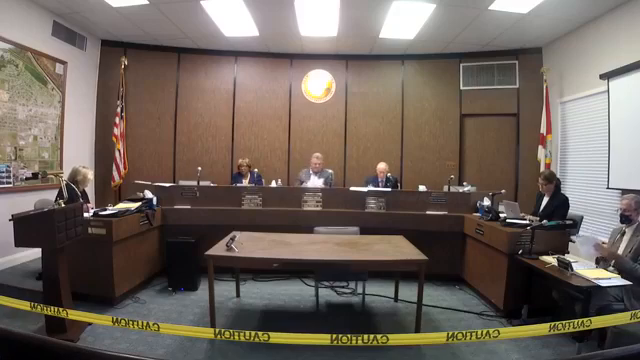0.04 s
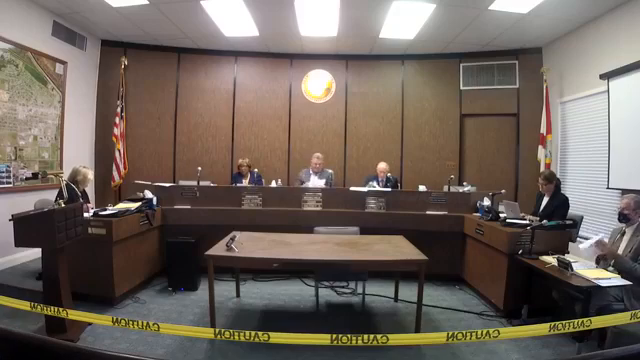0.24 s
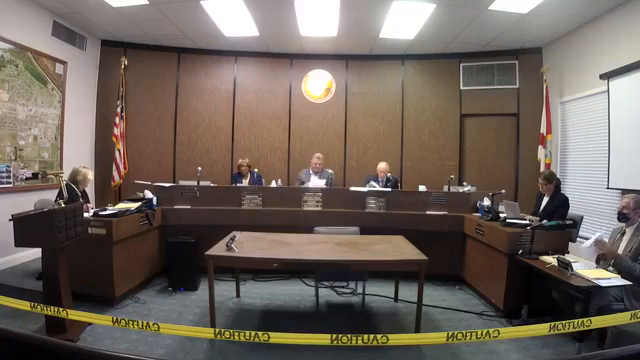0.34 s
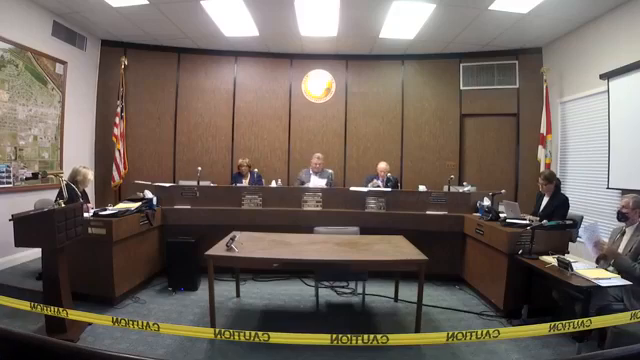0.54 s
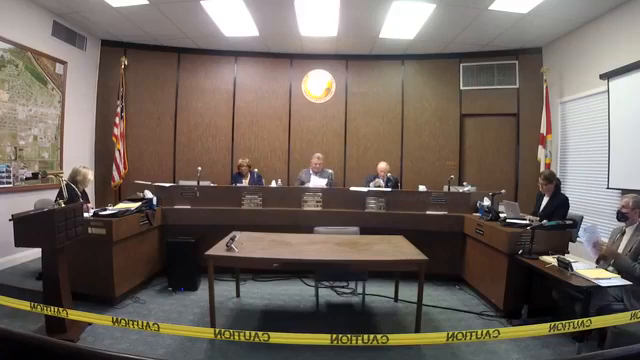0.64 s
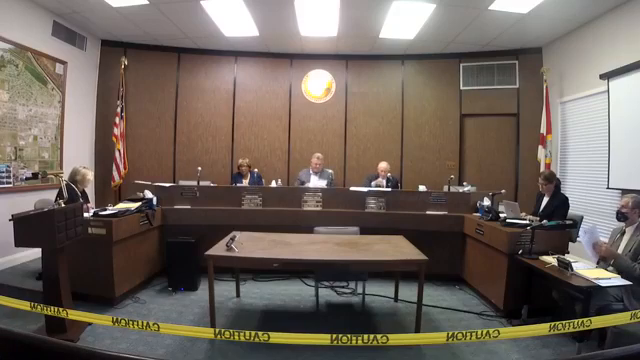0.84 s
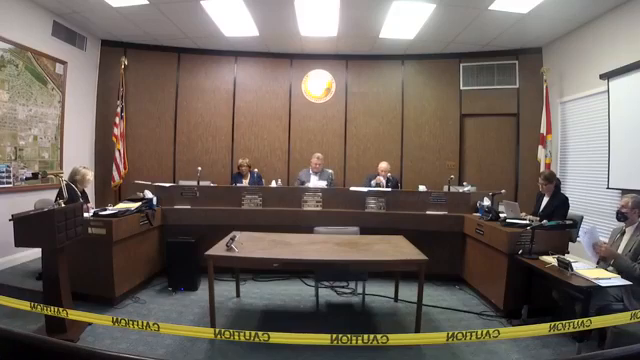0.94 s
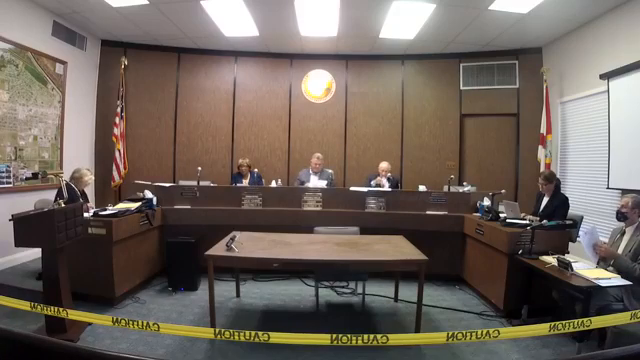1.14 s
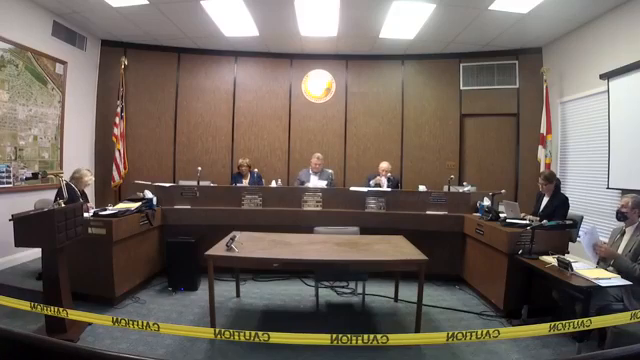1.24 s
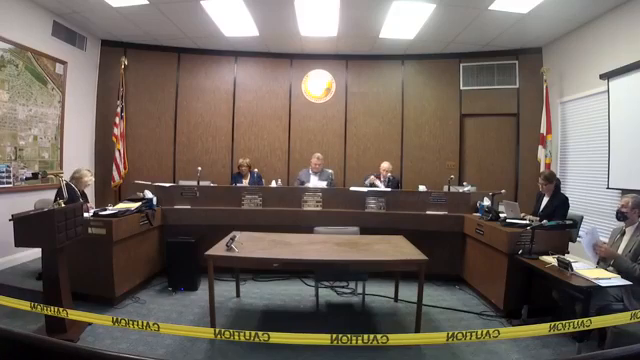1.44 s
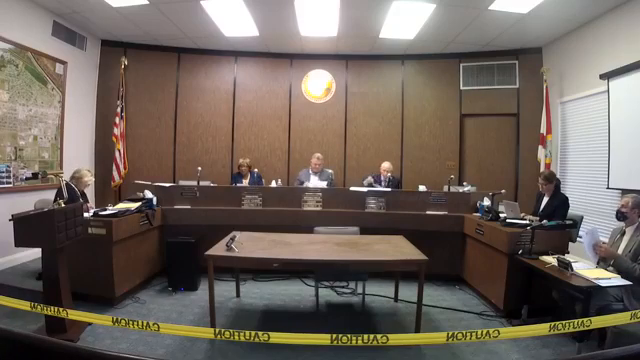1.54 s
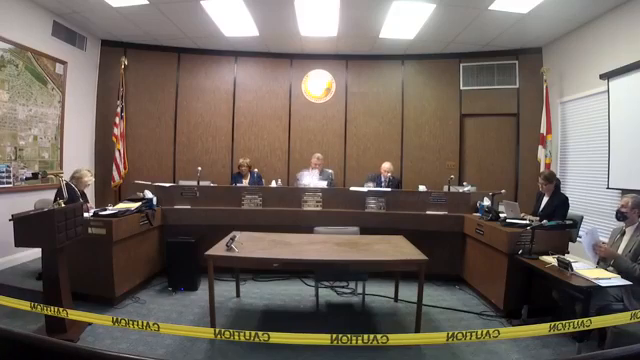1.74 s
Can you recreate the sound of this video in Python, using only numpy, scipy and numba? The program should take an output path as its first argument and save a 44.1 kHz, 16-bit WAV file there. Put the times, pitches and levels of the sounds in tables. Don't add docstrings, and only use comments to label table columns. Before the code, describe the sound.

Paper is handled on a desk close to a table microphone: faint rustles, two loud plastic clip snaps, then crisp bursts of crumpling and soft thuds in a quiet panelled room with low ventilation hum.

```python
import sys
import numpy as np
from scipy import signal
from scipy.fft import rfft, irfft
from scipy.io import wavfile
from scipy.ndimage import uniform_filter1d
from numba import njit

SR = 44100
rng = np.random.default_rng(int(sys.argv[2]) if len(sys.argv) > 2 else 0)


def invert_db(x):
    u = np.asarray(x, float) / 20
    return 10 ** u


def transcribe(u):
    v = np.clip(np.atleast_2d(u).T, -1, 1)
    q = np.round(v * 32767).astype(np.int16)
    wavfile.write(sys.argv[1], SR, q)


N = 79380

# peak t/s, rise/s, fall/s, level/dB, f/Hz
STROKES = [(0.044, 0.027, 0.015, -57.5, 1150), (0.098, 0.0038, 0.013, -41.5, 1030),
           (.139, 0.0017, 0.0047, -39, 1900), (.151, 0.0023, .006, -34, 1770),
           (0.16, 0.0057, .014, -42, 1170), (.42, 0.055, 0.078, -44.5, 1260),
           (.528, .003, .02, -34.5, 1980), (0.562, 0.013, 0.026, -45.5, 1370),
           (0.734, 0.015, 0.014, -53.5, 1220), (0.8, 0.0015, 0.008, -44.5, 1550),
           (0.928, 0.00068, 0.023, -37, 1780), (.96, 0.021, .02, -49.5, 593),
           (1.0, 0.029, 0.014, -33.5, 1890), (1.014, 0.0086, 0.0098, -24.5, 1470),
           (1.027, 0.003, 0.01, -15.5, 2054), (1.052, 0.0053, 0.021, -24, 2160),
           (1.102, 0.0018, 0.01, -36, 2500), (1.125, .012, 0.0071, -26, 2170),
           (1.138, 0.0023, 0.0031, -25, 2500), (1.148, 0.004, 0.013, -27.5, 2060),
           (1.413, 0.0044, 0.02, -38, 1420), (1.429, .002, .006, -36, 1570),
           (1.443, 0.013, .006, -39, 2200), (1.4537, 0.00104, 0.0043, -25, 1460),
           (1.471, 0.00087, 0.0063, -24, 1330), (1.488, 0.0045, 0.0085, -29, 1630),
           (1.502, 0.0085, 0.013, -27.5, 1410), (1.534, 0.007, 0.019, -31, 1300),
           (1.56, 0.009, 0.053, -48, 1016), (1.655, 0.0066, 0.0089, -35.5, 1195),
           (1.666, 0.0051, .006, -38, 1330), (1.722, 0.00095, .008, -38.5, 1670),
           (1.758, 0.016, 0.012, -34, 1820), (1.785, 0.017, 0.027, -37.5, 1480)]
# t/s, peak
# level/dB, f/Hz
SHARP_CREASES = [(0.096, -27, 3150), (.1385, -43, 3540), (0.192, -53, 3000), (0.268, -31, 4530),
                 (.339, -18.5, 4000), (0.3588, -16, 6400), (0.527, -33, 3040), (.559, -46, 3470),
                 (0.734, -30.5, 3480), (0.8965, -28, 7000), (0.9286, -44, 2500), (1.0004, -24.5, 2500),
                 (1.0173, -29, 2500), (1.027, -23, 2730), (1.1015, -39, 4000), (1.146, -32, 2500),
                 (1.158, -31, 2500), (1.4721, -18.5, 2500), (1.486, -25, 4940), (1.52, -21, 3500),
                 (1.608, -30.5, 2500), (1.643, -24, 2660), (1.666, -27, 5900), (1.757, -29.5, 2920),
                 (1.7663, -39, 3400)]
# peak t/s, rise/s, fall/s, level/dB, tilt/(dB per octave)
SLIDES = [(0.099, 0.0041, 0.0062, -51, -8), (.115, 0.006, 0.0093, -54, -2), (0.138, .004, .03, -54, -3),
          (0.239, 0.0027, 0.041, -49.5, -6), (0.3207, .0005, 0.011, -30.5, 3),
          (0.326, 0.0011, 0.026, -44.5, 9.5), (.385, 0.007, 0.047, -44.5, 1.5),
          (0.525, 0.0015, 0.0065, -51, -3), (0.56, 0.0025, 0.031, -62, 2),
          (.735, 0.019, 0.031, -58.5, -0.5), (0.934, 0.01, 0.017, -47, -2.2),
          (0.977, 0.029, 0.043, -46.5, 2.5), (1.029, 0.025, 0.021, -38, -2),
          (1.106, .003, 0.0067, -41.5, -6), (1.15, 0.013, 0.036, -48.5, 4.5),
          (1.199, 0.037, 0.06, -52, -5.5), (1.351, 0.011, 0.054, -59.5, -11.2),
          (1.452, .025, 0.015, -45, 5.5), (1.487, 0.015, 0.017, -42.5, 1.5),
          (1.561, 0.039, 0.044, -47.5, 0), (1.641, 0.0067, 0.014, -52, 0), (1.69, 0.022, .02, -66, 14),
          (1.76, 0.042, .05, -54.5, -2.5)]
# f/Hz, width/Hz, level/dB
HISS_BANDS = [(2560, 3200, 3.5), (4070, 1700, 1), (7200, 4000, -9), (8840, 1320, -6), (12600, 3400, -28.5)]
# t/s, peak level/dB
SNAPS = [
    (0.2343, -2),
    (0.3239, 0.5),
]
CLIP_MODES = [
    [(800, 370, -12), (1850, 440, -3.7), (3590, 370, -10.5), (4700, 820, 1.5), (6400, 460, -19),
     (7000, 350, -38), (8900, 180, -49)],
    [(1150, 850, 6.5), (1930, 160, -0.5), (2500, 670, 1), (4090, 370, 4), (4770, 220, 0.5),
     (5900, 630, 4.5), (7450, 1700, 6), (9800, 620, -0.5), (10400, 290, -31)],
]
# t/s, level/dB, length/s
THUDS = [(0.137, -46, 0.04), (0.317, -37.5, 0.035), (0.523, -41.5, 0.031), (0.713, -42, 0.014),
         (0.926, -45.5, 0.056), (0.983, -41.5, 0.07), (1.006, -35.5, 0.052), (1.129, -43, 0.023),
         (1.254, -46, 0.015), (1.4, -46.5, 0.099), (1.473, -48.5, 0.065), (1.631, -43, 0.029),
         (1.73, -43, 0.056)]
# f/Hz, width/Hz, level/dB
DESK_MODES = [(122.2, 22, -10), (203, 152, -3.5), (333, 232, -9.5), (524, 330, -6.5)]
# f/Hz, level/(dB per Hz)
AIR_SPECTRUM = [(18, 1), (60, -14), (161, 4), (319, -2.5), (1540, -10), (1860, -7), (2290, -10.5),
                (3140, -10), (16000, -19.5)]
# f/Hz, width/Hz, level/dB
HUM_BANDS = [(121.4, 10.7, -63), (182, 52, -65.5)]


def creases():
    pops, spread_oct, ring_cycles, scatter_db = 320, 0.45, 1.6, 1.5
    out = 0
    for t, rise, fall, db, hz in STROKES:
        u = rng.random((pops, 2)).T
        g = rng.standard_normal((pops, 2)).T
        late = -3 * rise + 3 * (rise + fall) * u[0]
        pitch = 2 ** (spread_oct * g[0])
        size = invert_db(db + 4.5 - scatter_db * np.log(u[1])) * swell(late, rise, fall) * np.sign(g[1])
        size = size * np.sqrt((rise + fall) * 20 * pitch)
        out = out + swarm(t + late, hz * pitch, ring_cycles, size)
    return out


def sharp_creases():
    pops, fade_s, spread_oct, ring_cycles = 12, 0.0018, 1.32, 1.48
    out = 0
    for t, db, hz in SHARP_CREASES:
        u = rng.random((pops, 3)).T
        place = 2 * (np.arange(pops) + u[1]) / pops - 1
        pitch = 2 ** (spread_oct * place)
        size = invert_db(db + 3.5) * np.sign(u[2] - 0.5) * np.exp(-2 * u[0])
        out = out + swarm(t + 2 * fade_s * u[0], hz * pitch, ring_cycles, size)
    return out


def swarm(t, hz, cycles, size):
    hz = np.clip(hz, 200, 15000)
    start = (t * SR).astype(np.int64)
    return grains(N, start, 2 * np.pi * hz / SR, np.exp(-hz / SR / cycles), size)


@njit
def grains(n, start, turn, fade, size):
    out = np.zeros(n)
    for k in range(len(start)):
        wave = size[k] + 0j
        step = fade[k] * np.exp(1j * turn[k])
        soft = 1.0
        for i in range(max(start[k], 0), min(start[k] + 600, n)):
            out[i] += wave.imag * (1 - soft)
            wave *= step
            soft *= fade[k] ** 3
    return out


def swell(late, rise, fall):
    return np.exp(np.where(late < 0, late / rise, -late / fall))


def slides():
    boost_db, flicker_db = 3, 1.3
    t, out = np.arange(N) / SR, 0
    shapes = [swell(t - peak, rise, fall) for peak, rise, fall, _, _ in SLIDES]
    for hz, width, band_db in HISS_BANDS:
        octaves = np.log2(hz / 5000)
        loudness = 0
        for (_, _, _, db, tilt), shape in zip(SLIDES, shapes):
            loudness = loudness + invert_db(db + boost_db + tilt * octaves) * shape
        hiss = band(band(rng.standard_normal(N), hz, width), hz, 2 * width)
        flicker = invert_db(flicker_db * (walk(25) + walk(250)))
        out = out + loudness * level(hiss, band_db - 5.5) * flicker
    return out


def walk(rate):
    hold = int(SR / rate)
    steps = np.repeat(rng.standard_normal(N // hold + 1), hold)
    return 1.4 * uniform_filter1d(steps, hold)[:N]


def snaps():
    rattle_db, rattle_s, narrow = -23.5, 0.003, 0.7
    out = np.zeros(N)
    for (t, db), modes in zip(SNAPS, CLIP_MODES):
        kick, i = np.zeros(N), int(t * SR)
        rattle = rng.standard_normal(400) * np.exp(-np.arange(400) / SR / rattle_s)
        kick[i:i + 400] = invert_db(rattle_db) * rattle
        kick[i:i + 4] += 0.4, 1, 1, 0.4
        ring = 0
        for k, (hz, width, mode_db) in enumerate(modes):
            mode = band(band(kick, hz, 4 * width), hz, width * narrow) / width
            ring = ring + (-1) ** k * invert_db(mode_db) * mode
        out = out + invert_db(db) * ring / np.abs(ring).max()
    return out


def thuds():
    rise_s = 0.0049
    t, push = np.arange(N) / SR, 0
    for start, db, length in THUDS:
        late = t - start
        push = push + invert_db(db) * np.clip(late / rise_s, 0, 1) * np.exp(-np.clip(late, 0, 2) / length)
    noise, out = rng.standard_normal(N), 0
    for hz, width, db in DESK_MODES:
        out = out + invert_db(db) * band(band(noise, hz, 2 * width) * push, hz, width)
    return 14 * out


def room(x):
    t60_s, tail_db, gap_s, top_hz = 0.44, -17.5, 0.0021, 7300
    t = np.arange(int(0.6 * SR)) / SR
    tail = rng.standard_normal(len(t)) * np.exp(-np.log(1000) * t / t60_s)
    tail = tail * np.clip(t / gap_s - 1, 0, 1)
    tail = signal.lfilter(*signal.butter(1, top_hz, fs=SR), tail)
    tail = tail * invert_db(tail_db) / np.sqrt(np.sum(tail ** 2))
    return signal.fftconvolve(x, tail)[:N]


def air():
    air_db = -47
    hz, db = np.array(AIR_SPECTRUM).T
    f = np.maximum(np.arange(N // 2 + 1) * SR / N, 1)
    shape = invert_db(np.interp(np.log(f), np.log(hz), db))
    noise = irfft(rfft(rng.standard_normal(N)) * shape, N)
    hum = 0
    for hum_hz, width, hum_db in HUM_BANDS:
        tone = band(band(rng.standard_normal(N), hum_hz, width), hum_hz, width)
        hum = hum + level(tone, hum_db)
    return level(noise, air_db - 6.5) + hum


def level(x, db):
    return x * invert_db(db) / np.sqrt(np.mean(x ** 2))


def band(x, hz, width):
    return signal.lfilter(*signal.iirpeak(min(hz, 20000), max(hz / width, 0.3), fs=SR), x)


def scene():
    paper_band = signal.butter(2, [427, 10000], "band", fs=SR, output="sos")
    paper = signal.sosfilt(paper_band, creases() + sharp_creases())
    desk = paper + snaps() + thuds()
    return (desk + room(desk) + slides() + air())[None]


def low_pass(x):
    return signal.sosfilt(signal.butter(12, 16520, fs=SR, output="sos"), x)


def record(dry):
    bass_cut = signal.butter(2, 70, "high", fs=SR, output="sos")
    top_cut = signal.ellip(8, 0.3, 60, 15900, fs=SR, output="sos")
    mix = signal.sosfilt(top_cut, signal.sosfilt(bass_cut, dry))
    return low_pass(mix)


dry = scene()
out = record(dry)
transcribe(out)
```